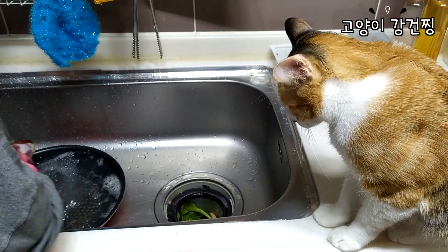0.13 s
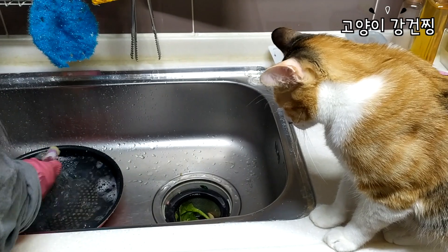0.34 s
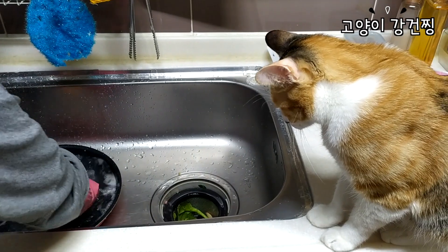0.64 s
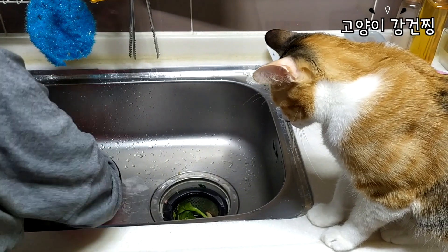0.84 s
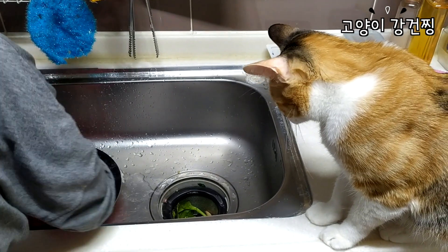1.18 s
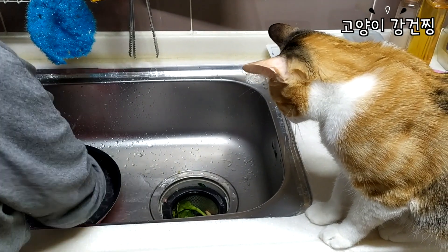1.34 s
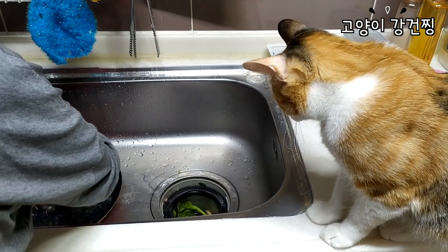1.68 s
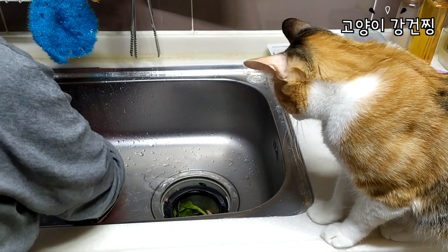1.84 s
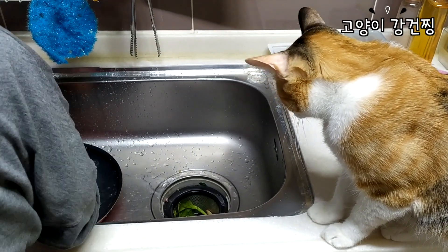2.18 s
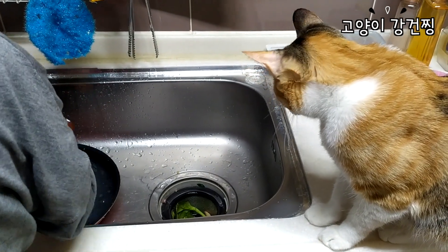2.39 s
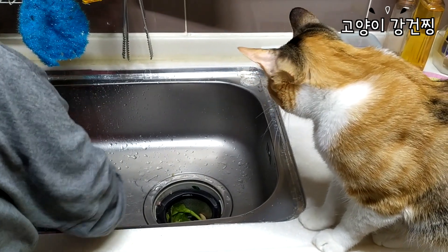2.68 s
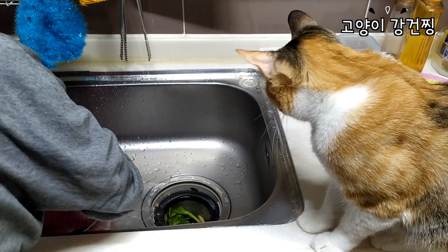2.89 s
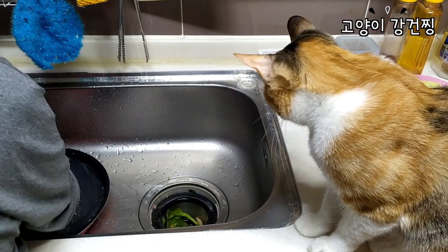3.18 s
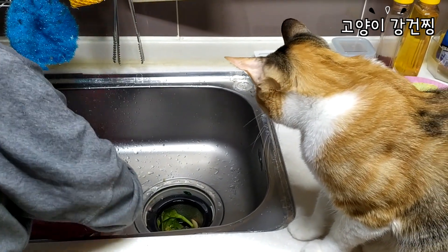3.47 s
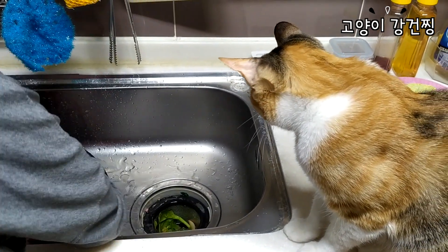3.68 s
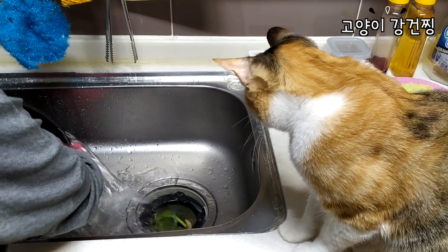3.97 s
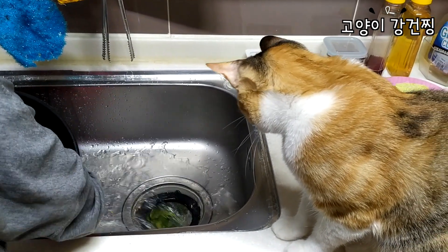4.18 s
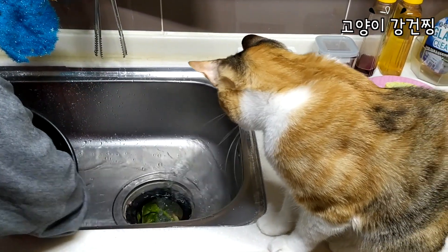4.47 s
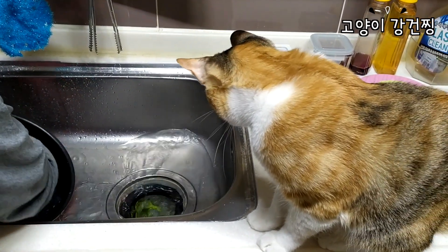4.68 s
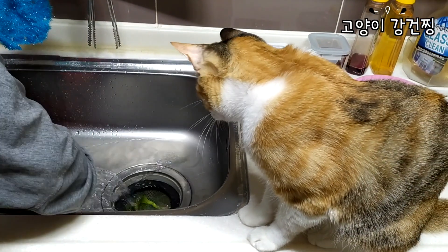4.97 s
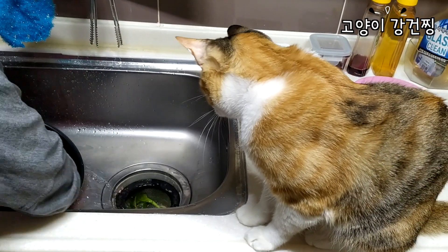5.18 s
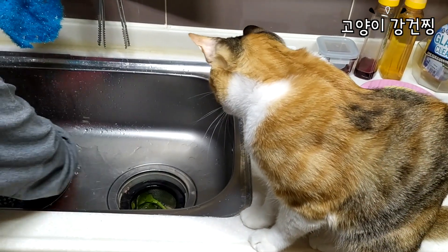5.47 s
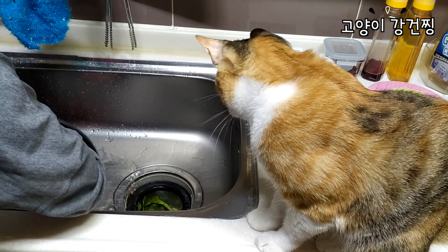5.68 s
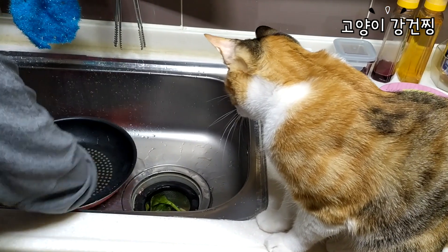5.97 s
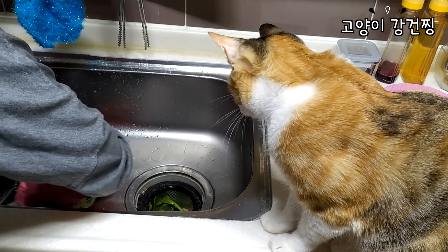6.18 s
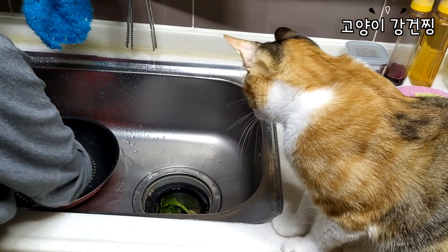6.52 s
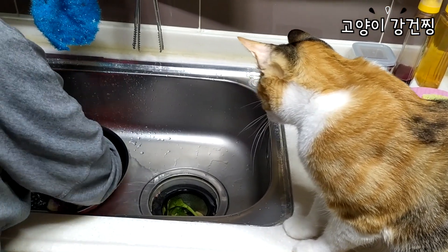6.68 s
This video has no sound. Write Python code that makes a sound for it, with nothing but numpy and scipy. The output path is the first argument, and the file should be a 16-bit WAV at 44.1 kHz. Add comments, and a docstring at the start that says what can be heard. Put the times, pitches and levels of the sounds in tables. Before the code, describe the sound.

Steady hissing tap spray and soft sponge scrubbing, with a frying pan knocking and scraping dully against a steel sink, water splashing midway.

```python
"""In a kitchen with tiled walls, a frying pan is scrubbed and rinsed in a steel sink, heard at two microphone ports.
Spray, sponge and pan water are dense random impacts in fixed colours; splashes and gurgles are crowds of bubbles.
The pan knocks the basin and drags over it, ringing one set of damped steel modes; a fading noise stands for
the modes too many to count. Spurts of spray and sharp knocks flare in the treble over a quiet kitchen noise."""
import sys
import numpy as np
from scipy import signal
from scipy.fft import rfft, irfft, next_fast_len
from scipy.io import wavfile
from scipy.ndimage import uniform_filter1d

SR = 44100
rng = np.random.default_rng(int(sys.argv[2]) if len(sys.argv) > 2 else 0)


def inscribe(sig):
    """Save sig as 16-bit PCM at rate SR to the path in sys.argv[1].

    A 1-D sig is mono; a 2-D sig holds one channel per row.
    Samples are clipped to [-1, 1] before scaling.
    """
    pcm = np.round(np.clip(np.atleast_2d(sig).T, -1, 1) * 32767)
    wavfile.write(sys.argv[1], SR, pcm.astype(np.int16))


N = 302085
T = np.arange(N) / SR

# washing: t/s, spray level/dB, sponge level/dB, level/dB of the water in the pan
WASHING = [(0.0, -24, -35.5, -39.5), (0.12, -23.5, -36.5, -40), (0.23, -25, -35, -50),
           (0.67, -23.5, -35.5, -37.5), (0.8, -23.5, -34.5, -40), (1.12, -24, -36, -41.5),
           (1.52, -24.5, -35, -40), (1.83, -23.5, -36.5, -41.5), (2.45, -25, -36, -39),
           (2.65, -23, -36.5, -40.5), (2.96, -23, -34.5, -41), (3.24, -24.5, -38, -44.5),
           (3.5, -26, -35.5, -41.5), (3.7, -26.5, -39, -44.5), (3.81, -25, -42, -44),
           (3.91, -25.5, -33, -39), (3.99, -26.5, -35, -37), (4.06, -23, -34, -38), (4.1, -26.5, -27, -40),
           (4.14, -23.5, -30.5, -46), (4.21, -26, -33, -50), (4.24, -26, -35.5, -46),
           (4.35, -23.5, -38, -41), (4.5, -29, -42.5, -51), (4.62, -25, -36.5, -45),
           (4.77, -27, -40.5, -46), (4.83, -29, -43, -44), (5.0, -28.5, -43.5, -52), (5.17, -26, -45, -53),
           (5.24, -28.5, -46, -51), (5.33, -26, -45, -42), (5.4, -30, -45.5, -47),
           (5.66, -29.5, -46, -52.5), (5.86, -24, -41.5, -43.5), (6.08, -23.5, -40, -47.5),
           (6.26, -26.5, -42, -45.5), (6.37, -25.5, -45.5, -42), (6.52, -30, -46, -43),
           (6.7, -24.5, -37, -46), (6.85, -29, -41.5, -43)]
# knocks of the pan: t/s, thud drive/dB, thud f/Hz, ring drive/dB, favoured low, middle and high mode f/Hz,
# brightness/dB per octave, favoured clink f/Hz, clink drive/dB, crash level/dB, treble flare level/dB
KNOCKS = [(0.675, -34.5, 99, -15, 274, 470, 990, 0, 1980, -25, -28, -22),
          (0.953, -27, 100, -37, 186, 388, 800, 0.5, 1400, -33.5, -24.5, -26),
          (1.287, -25, 101, -32, 206, 376, 790, -6, 1400, -41, -24, -30),
          (1.3, -41, 102, -41, 226, 530, 880, 2, 1560, -40.5, -34, -23),
          (2.858, -43, 99, -33, 310, 354, 730, 0, 2000, -56, -52, -45),
          (2.883, -37, 101, -28.5, 191, 426, 707, 2, 2000, -56, -27, -45),
          (2.984, -24.5, 70, -16, 187.7, 374, 1086, -2.5, 2240, -23, -22.5, -9),
          (3.013, -40, 100, -22, 204, 362, 1086, 0, 1700, -35.5, -26.5, -47),
          (3.037, -45, 100, -37, 204, 362, 1086, -5, 2220, -44, -54, -34),
          (3.053, -45, 100, -38, 192, 510, 1086, 2.5, 2490, -41, -58, -31),
          (3.478, -16, 52, -22, 228, 372, 1040, -12, 2000, -32.5, -22, -22),
          (3.509, -47, 52, -31.5, 203, 305, 657, -1, 2000, -44, -60, -54),
          (3.842, -30, 70, -26.5, 186, 410, 860, -17, 1700, -39, -22, -20.5),
          (4.099, -34, 100, -38, 193, 392, 1085, -1.5, 2220, -40, -27.5, -22),
          (5.153, -43, 90, -36, 322, 380, 700, 2.5, 2000, -66, -57, -59),
          (5.679, -23.5, 105, -14.5, 320, 614, 810, -4.5, 2260, -25.5, -15.5, -11.5),
          (5.703, -34, 105, -31.5, 292, 520, 780, 2, 2300, -42, -32, -40),
          (5.967, -26, 75, -30.5, 190, 404, 676, -3, 2200, -38, -33, -13),
          (6.087, -52, 89.3, -33, 256, 362, 754, -20, 2100, -42, -56, -29),
          (6.359, -30, 100, -65, 226, 530, 654, 4, 2000, -53, -58, -41),
          (6.408, -26, 130, -14.5, 177, 340, 660, -17.5, 2000, -47, -66, -54),
          (6.663, -42, 100, -30, 230, 307, 654, -5, 2000, -57, -55, -54),
          (6.745, -38, 100, -31, 286, 348, 664, -15, 2000, -57, -55, -54),
          (6.82, -46, 99, -13, 195, 414, 960, -10, 1900, -38, -26.5, -18)]
# modes of cabinet, basin and pan: f/Hz, relative level/dB, t60/s when knocked
STEEL_MODES = [(44.5, -15, 0.33), (53, -3, 0.3), (88, -8, 0.17), (102, -3, 0.36), (136.2, 0, 0.28),
               (186, 2.5, 0.22), (204, -1, 0.22), (231.4, 0.5, 0.17), (252, -1.5, 0.17), (285, 1, 0.31),
               (306, -4.5, 0.22), (362, 2, 0.28), (392, -3, 0.2), (427, -3, 0.22), (496, 1, 0.27),
               (530, 1.5, 0.17), (654, 2, 0.17), (747, 1, 0.2), (808, 4, 0.22), (895, 4, .15),
               (957, -1, 0.15), (1086, 6, .16), (1380, -5, .12), (1565, -6, .13), (1696, 1, 0.13),
               (1890, 1, 0.11), (1975, 1, .13), (2065, 2, 0.13), (2221, 2, 0.14), (2368, 3, 0.13),
               (2492, 1, .13), (2740, -6, .13), (3624, -21, .15), (3750, -26, .13), (3885, -22, .18),
               (4400, -22, .13), (4740, -24, .15), (5120, -22, .2), (5852, -20, .28), (7014, -20, .2),
               (7195, -16, .22), (7480, -19, .35), (7728, -20, .25), (8220, -19, .22)]

ALIKE_HZ = 580  # well below this both ports hear the same wave
LEFT_LAG_S = 0.0002
CLINK_FROM_HZ, SHIMMER_FROM_HZ = 1250, 3000


def undb(db):
    """A level in dB is a logarithmic measure of amplitude; returns the gain."""
    return np.exp(np.asarray(db, float) * np.log(10) / 20)


def read(table, hz):
    """A spectrum given at a few frequencies is interpolated along a log-frequency axis."""
    table = np.array(table)
    return np.interp(np.log(hz + 1e-9), np.log(table[:, 0]), table[:, 1])


def unit(x):
    """Normalization by the root mean square: the result has rms 1."""
    return x / np.sqrt(np.mean(x ** 2))


def walk(rate):
    """Slow random modulation: random levels held 1 / rate s and smoothed twice, rms 1."""
    hold = int(SR / rate)
    steps = np.repeat(rng.standard_normal(N // hold + 1), hold)
    return unit(uniform_filter1d(uniform_filter1d(steps, hold), hold)[:N])


def droplets(colour, grain_db, flicker_db):
    """Shot noise: dense impacts of uneven size, coloured; half-octave bands flicker; the ports share only the bass."""
    n = next_fast_len(N)
    hz = np.fft.rfftfreq(n, 1 / SR)
    size = undb(grain_db * np.minimum(rng.exponential(size=N), 5.0))
    size = uniform_filter1d(size, size=8)
    shared, left, right = rfft(rng.standard_normal((3, N)) * size, n)
    alike = 1 / (1 + (hz / ALIKE_HZ) ** 3)
    late = np.exp(-2j * np.pi * hz * LEFT_LAG_S)
    common = np.sqrt(alike) * shared * [late, 1 + 0 * late]
    separate = np.sqrt(1 - alike) * np.array([left, right])
    pair = (common + separate) * undb(read(colour, hz))
    octave = np.log2(hz + 1e-9)
    out = 0
    for centre in np.arange(np.log2(colour[0][0]), np.log2(colour[-2][0]) + .5, .5):
        band = np.cos(np.pi * np.clip(octave - centre, -.5, .5)) ** 2
        out = out + irfft(pair * band, n)[:, :N] * undb(flicker_db * walk(17))
    return unit(out)


def bursts(times, dbs, t60s, rise_s):
    """Exponential decay after a quick swell: the envelope of all events, each cut off after half a second."""
    out = np.zeros(N)
    for start, db, t60 in np.broadcast(times, dbs, t60s):
        first = int(start * SR)
        t = T[first:first + SR // 2] - start
        swell = 1 - np.exp(-np.maximum(t, 0) / rise_s)
        out[first:][:len(t)] += undb(db) * swell * 1000. ** (-t / t60)
    return out


def bubbles(rows, glide):
    """Bubble resonance: each is a fading sine that rises in pitch and reaches the ports out of step."""
    out = np.zeros((2, N + SR))
    turns = rng.uniform(-np.pi, np.pi, (len(rows), 2, 1))  # phase/rad at each port
    for (start, hz, db, t60), turn in zip(rows, turns):
        t = T[:int(t60 * SR)]
        shape = undb(db) * (1 - np.exp(-t / t60 * 12)) * 1000. ** (-t / t60)
        phase = 2 * np.pi * hz * t * (1 + glide * t / t60)
        out[:, int(start * SR):][:, :len(t)] += shape * np.sin(phase + turn)
    return out[:, :N]


def washing_db(column):
    """Slow change of source strength: one level of the washing, interpolated linearly in time."""
    table = np.array(WASHING)
    return np.interp(T, table[:, 0], table[:, column])


def spray():
    """Shot noise of the water jet: its many drop impacts add up to a treble hiss, and the jet wavers."""
    # colour of the spray: f/Hz, relative level/dB per Hz
    colour = [(2350, -41), (4000, -18.5), (4490, -11), (5360, -12.5), (7380, -2.5), (9070, -2),
              (13700, -9.5), (15000, -15.5), (15700, -67)]
    return droplets(colour, 3.5, 1.0) * undb(washing_db(1) + .5 * walk(13))


def sizzle():
    """Sudden onset and reverberant decay: spurts and sharp knocks flare in the treble, then fade in the tiled room."""
    # spurts of spray off the pan: t/s, peak level/dB, t60/s
    spurts = [(0.1101, -20, 0.36), (0.284, -20, 0.46), (0.6434, -17.5, 0.13), (1.8994, -24.5, 1),
              (2.358, -20.5, 0.25), (3.34, -23, 0.89), (3.813, -22.5, 0.59), (3.9294, -24, 0.68),
              (4.019, -10.5, 0.067), (4.0824, -21.5, 0.89), (4.17, -38, 0.6), (4.33, -28, 0.2),
              (4.599, -28, 0.27), (5.0454, -45, 0.15), (5.1163, -40, 0.11), (5.2794, -26, 0.23),
              (5.524, -26, 0.33), (5.8616, -24, 0.2)]
    # colour of the spurts: f/Hz, relative level/dB per Hz
    spurt_colour = [(2900, -19), (4000, -3.5), (5500, -2.5), (7400, 5.5), (9500, 6), (12000, 1),
                    (14000, -13.5), (15700, -19)]
    # colour of the flares at the knocks: f/Hz, relative level/dB per Hz
    flare_colour = [(2940, -13), (3500, -9), (4000, -5), (5000, 2), (5480, -2), (5910, 0.5), (6670, 2.5),
                    (7440, 4), (11500, -2), (14000, -10), (15700, -20)]
    knocks = np.array(KNOCKS)
    spurting = droplets(spurt_colour, 1.3, 1) * bursts(*np.transpose(spurts), rise_s=0.0015)
    flares = bursts(knocks[:, 0], knocks[:, -1], t60s=0.24, rise_s=0.0018)
    return spurting + droplets(flare_colour, 0.76, 0.87) * flares


def sponge():
    """Friction noise: the rubbing sponge is a dense run of uneven impacts in its own colour."""
    # colour of the sponge: f/Hz, relative level/dB per Hz
    colour = [(650, -42), (1100, -2.5), (1230, -10.5), (1790, -5.5), (1910, 0), (3000, -2.5), (4480, -3.5),
              (5340, -52), (5800, -5), (7540, -44), (12800, -120)]
    return droplets(colour, 2.9, flicker_db=1.8) * undb(washing_db(2))


def pool():
    """Shot noise of agitated water: the water in the pan is dense impacts, mostly in the middle register."""
    # colour of the water in the pan: f/Hz, relative level/dB per Hz
    colour = [(260, -70), (450, -24), (488, -31), (526, -34), (627, -37), (661, -1.5), (880, 0), (960, 5.5),
              (1050, -2), (1400, -5.5), (1820, -5.5), (3080, -120)]
    return droplets(colour, 2.4, flicker_db=2.4) * undb(washing_db(3))


def splash(count=100, scatter_db=3.5):
    """Pitch falls with bubble size: a surge is a crowd of bubbles, the small high and brief, a few loud."""
    # surges of rinse water tipped out of the pan: t/s, length/s, level/dB of the softest bubble
    surges = [(3.795, 0.061, -29), (3.861, .05, -34), (3.927, 0.046, -27.5), (4.012, 0.024, -31),
              (4.08, 0.054, -27.5), (4.142, .025, -33), (4.177, 0.035, -32), (4.232, 0.025, -39)]
    # lowest and highest starting pitch of the bubbles: f/Hz, f/Hz
    lowest_hz, highest_hz = (1475, 5600)
    when, pitch, loud = np.moveaxis(rng.random((len(surges), count, 3)), -1, 0)
    start, length, db = np.array(surges).T[:, :, None]
    hz = lowest_hz * (highest_hz / lowest_hz) ** pitch
    db = db - scatter_db * np.log(1 - .95 * loud)
    rows = [start + length * when, hz, db, 22 / hz]
    return bubbles(np.reshape(rows, (len(rows), -1)).T, glide=0.2)


def gurgles(count=14, spread=.05, cycles=36):
    """Resonance of trapped air: a gurgle is a small crowd of brief bubbles around its pitch, spread over its length."""
    # gurgles of trapped air: t/s, central f/Hz, level/dB of the loudest bubble, length/s
    table = [(0.045, 943, -25.5, 0.12), (0.064, 1120, -27, 0.024), (0.268, 970, -25, 0.068),
             (0.385, 685, -28.5, 0.051), (3.657, 1440, -26, .04), (3.848, 850, -18.5, 0.05),
             (3.92, 2110, -18, 0.045), (4.142, 2250, -16.5, 0.06), (4.179, 3770, -17, .012),
             (4.873, 800, -27, 0.033), (4.919, 845, -36, 0.064), (5.28, 1650, -27, 0.06),
             (5.3, 1900, -32, .06), (6.108, 723, -34, 0.045), (6.324, 660, -30, 0.058),
             (6.58, 660, -33, 0.16), (6.652, 1160, -25, 0.061)]
    when, pitch, soft = np.moveaxis(rng.random((len(table), count, 3)), -1, 0)
    start, hz, db, length = np.array(table).T[:, :, None]
    hz = hz * (1 + spread * (2 * pitch - 1))
    rows = [start + length * when, hz, db - 8 * soft, cycles / hz]
    return bubbles(np.reshape(rows, (len(rows), -1)).T, glide=0.031)


def favour(hz, best_hz, fall_db, floor_db):
    """Selective excitation: modes away from the favoured one are driven less, by fall_db per octave."""
    return np.maximum(-fall_db * np.abs(np.log2(hz / best_hz)), floor_db)


def knock_db(hz):
    """Modal excitation by impact: thud, ring with three favoured modes, clink and shimmer, from low to high."""
    _, thud, thud_hz, ring, low_hz, middle_hz, high_hz, bright, clink_hz, clink, _, flare = np.transpose(KNOCKS)
    if hz < 150:
        return thud + favour(hz, thud_hz, fall_db=7.5, floor_db=-20)
    if hz > SHIMMER_FROM_HZ:
        return flare
    if hz > CLINK_FROM_HZ:
        return clink + favour(hz, clink_hz, fall_db=27, floor_db=-9.0)
    favoured = [favour(hz, best, fall_db=95, floor_db=-19.5) for best in (low_hz, middle_hz, high_hz)]
    return ring + bright * np.log2(hz / low_hz) + np.max(favoured, axis=0)


def resonate(push, hz, t60, rise_s):
    """Damped oscillator: one mode as a complex rotation that swells, then fades."""
    spin = np.exp(2j * np.pi * hz / SR)
    fade = 1000. ** (-1 / (t60 * SR))
    swell = np.exp(-1 / (rise_s * SR))
    return signal.lfilter([1 - swell], np.convolve([1, -fade * spin], [1, -swell * spin]), push)


def steel(rise_s=0.003, rise_cycles=0.3, muffled=0.63, askew=0.54):
    """Modal superposition: knocks and stick-slip dragging ring the modes; high ones reach the ports out of step."""
    # the pan shifts on the basin floor: t/s, dragging drive/dB, favoured mode f/Hz, cabinet rumble drive/dB
    drag = [(0.0, -55, 230, -72), (0.38, -54, 208, -53), (0.84, -47.5, 253, -51), (1.162, -67, 217, -52),
            (1.87, -60, 245, -57), (2.8, -52.5, 243, -68), (3.05, -36, 205, -38), (3.34, -50, 194, -44.5),
            (3.7, -38, 220, -41.5), (4.15, -37, 213, -41), (4.25, -42.5, 210, -44),
            (4.3, -41.5, 210, -43.5), (4.5, -43.5, 230, -37.5), (4.85, -39.5, 210, -47.5),
            (5.0, -67, 230, -63), (5.12, -46.5, 230, -53), (5.25, -40.5, 214, -38.5),
            (5.66, -51.5, 208, -40), (5.85, -33.5, 232, -35), (6.06, -44, 232, -46),
            (6.12, -41.5, 246, -44), (6.38, -42, 243, -52), (6.42, -34.5, 294, -47),
            (6.48, -34.5, 222, -50), (6.54, -32, 250, -47), (6.6, -29, 284, -54), (6.68, -32.5, 213, -49),
            (6.73, -32.5, 294, -52), (6.78, -39, 293, -53), (6.85, -60, 200, -58)]
    s, *columns = np.transpose(drag)
    drag_db, drag_hz, rumble_db = (np.interp(T, s, c) for c in columns)
    at = (np.array(KNOCKS)[:, 0] * SR).astype(int)
    slip_size = undb(2.24 * rng.exponential(size=N)) * undb(2.0 * walk(23))
    slips = unit(rng.standard_normal(N) * slip_size)
    out = np.zeros((2, N))
    for k, (hz, db, t60) in enumerate(STEEL_MODES):
        blows = np.zeros(N, complex)
        blows[at] = (-1) ** k * undb(knock_db(hz))  # neighbouring modes start in opposite directions
        ring = resonate(blows, hz, t60, rise_s + rise_cycles / hz)
        if hz < 1000:
            # dragging shakes the low modes only, and the pan resting on the steel muffles them
            rub_db = rumble_db if hz < 120 else drag_db + favour(hz, drag_hz, fall_db=17.5, floor_db=-17.5)
            rub_t60 = t60 * muffled
            # division by the root of the decay time offsets the build-up in long-ringing modes
            rub = slips * undb(rub_db) / np.sqrt(rub_t60 * SR / np.log(1e6))
            ring += resonate(rub, hz, rub_t60, rise_s)
        scatter = askew * rng.uniform(-np.pi, np.pi) / (1 + (ALIKE_HZ / hz) ** 3)
        apart = 2 * np.pi * hz * LEFT_LAG_S + scatter  # phase/rad between the ports
        left, right = (ring * np.exp(-.5j * apart)).imag, (ring * np.exp(.5j * apart)).imag
        out += undb(db) * np.array([left, right])
    return out


def banded(x, peak_width_hz=45, valley_db=-9, band_hz=60, band_db=2):
    """Resonant filtering: peaks at the steel modes, with smaller peaks and dips all along the spectrum."""
    spectrum = rfft(x)
    hz = np.fft.rfftfreq(N, 1 / SR)
    peaks = np.max([1 / np.hypot(1, 2 * (hz - mode[0]) / peak_width_hz) for mode in STEEL_MODES], axis=0)
    peaks = np.maximum(peaks, undb(valley_db))
    k = int(band_hz * N / SR)  # spectrum bins in a band
    steps = np.repeat(rng.standard_normal(N // k), k)
    bands = unit(uniform_filter1d(steps, k)[:spectrum.shape[1]])
    return unit(irfft(spectrum * peaks * undb(band_db * np.clip(bands, -2, 2)), N))


def crash():
    """High modal density: countless modes of steel and tiled walls merge into fading noise; soft knocks stay dull."""
    # colour of the crash: f/Hz, relative level/dB per Hz before the modal peaks
    colour = [(290, -6), (500, -6.5), (1080, -8), (1550, -6.5), (2300, -6.5), (2650, -5), (3300, -14),
              (3900, -7), (5000, -13), (7150, -51), (12100, -120)]
    knocks = np.array(KNOCKS)
    chatter = undb(2.2 * walk(160))  # the pan rattles against the steel as it settles
    noise = banded(droplets(colour, 0.6, 1.0)) * chatter
    dull = signal.sosfiltfilt(signal.butter(2, CLINK_FROM_HZ, fs=SR, output="sos"), noise)
    hiss = noise - dull
    hiss_db = knocks[:, -3] + 10  # the upper part follows the clink
    return (dull * bursts(knocks[:, 0], knocks[:, -2], t60s=0.38, rise_s=0.0012)
            + hiss * bursts(knocks[:, 0], hiss_db, t60s=.19, rise_s=0.0054))


def kitchen(level_db=-51.5):
    """Stationary background noise: the quiet kitchen is an even, low-pitched random noise."""
    # colour of the kitchen: f/Hz, relative level/dB per Hz
    colour = [(15, -38), (25, -25), (64, 1.5), (108, -2.5), (157, -2.5), (260, 1.5), (348, -11), (454, 3),
              (600, -3), (780, -15), (1320, -120)]
    return droplets(colour, 0.1, 1.0) * undb(level_db)


def scene():
    """Linear superposition of water, sponge, steel and the quiet kitchen."""
    water = spray() + sizzle() + pool() + splash() + gurgles()
    return water + sponge() + steel() + crash() + kitchen()


def record(dry):
    """Receiver response: most treble leans left, the deepest bass is lost, the loudest peaks clip, the top is cut."""
    # balance of the ports: f/Hz, left minus right level/dB
    balance = [(100, 1), (2500, 0), (4400, -1), (6500, 6.5), (8500, 1), (10500, 1), (12500, 4.5),
               (15000, 10)]
    n = next_fast_len(N)
    hz = np.fft.rfftfreq(n, 1 / SR)
    lean = read(balance, hz) / 2
    bass_cut = 1 / np.sqrt(1 + (38 / (hz + 1)) ** 8)
    heard = irfft(rfft(dry, n) * bass_cut * undb([lean, -lean]), n)[:, :N]
    top_cut = signal.ellip(10, .2, 80, 15800, fs=SR, output="sos")  # order, ripple/dB, rejection/dB, edge f/Hz
    return signal.sosfilt(top_cut, np.clip(heard, -1, 1))


dry = scene()
out = record(dry)
inscribe(out)
```